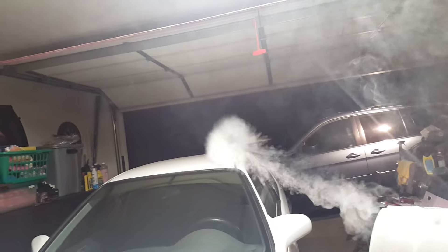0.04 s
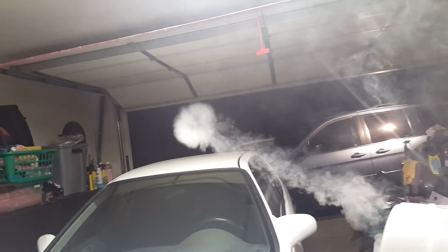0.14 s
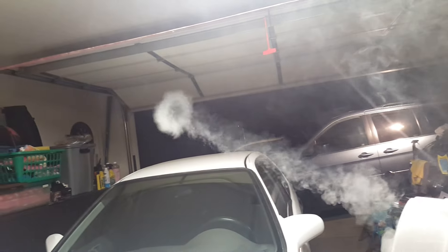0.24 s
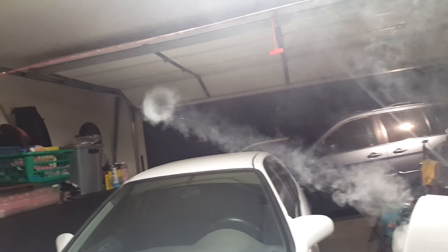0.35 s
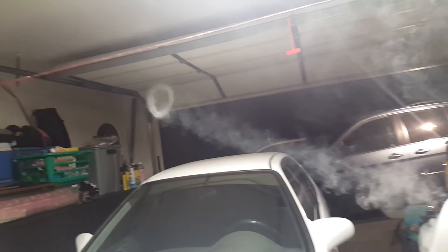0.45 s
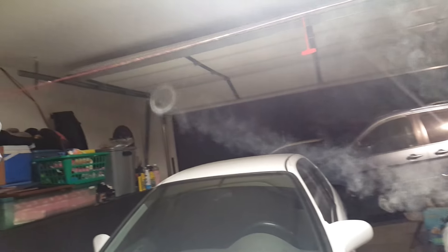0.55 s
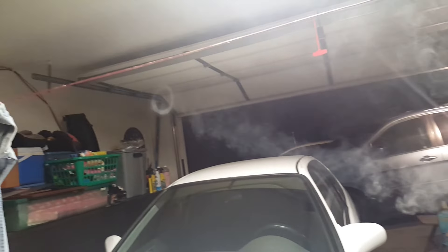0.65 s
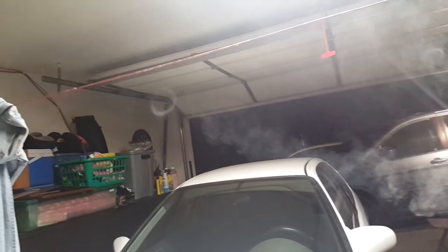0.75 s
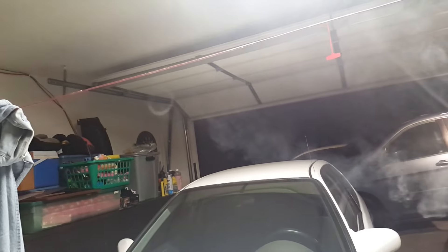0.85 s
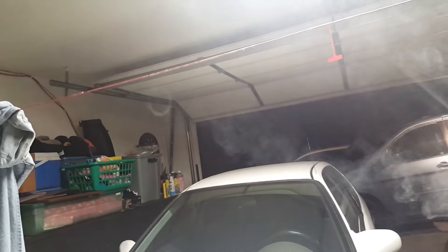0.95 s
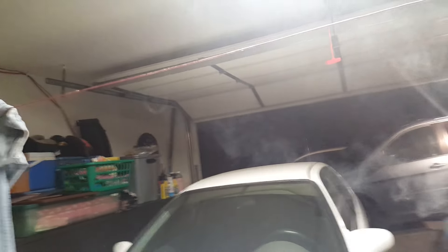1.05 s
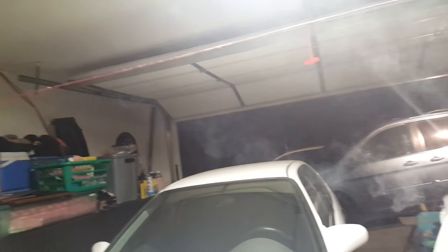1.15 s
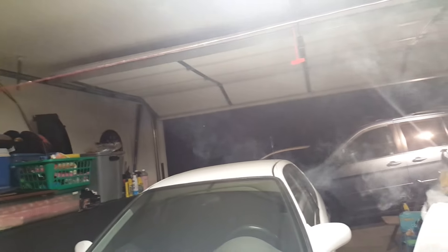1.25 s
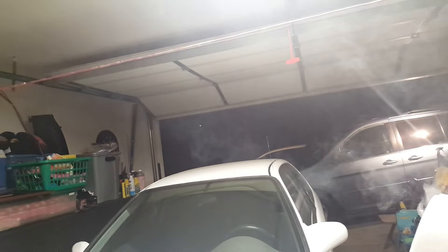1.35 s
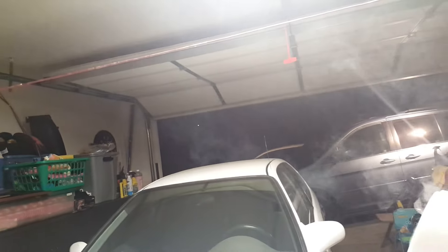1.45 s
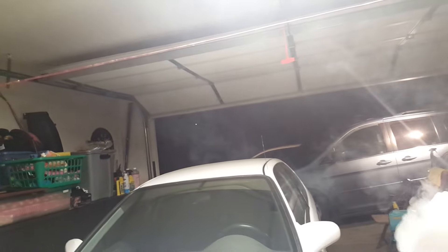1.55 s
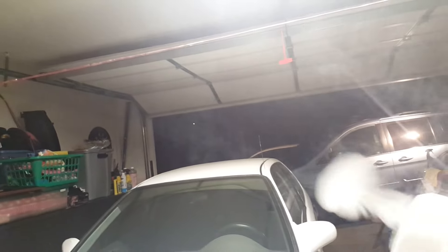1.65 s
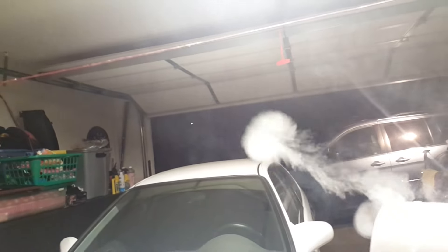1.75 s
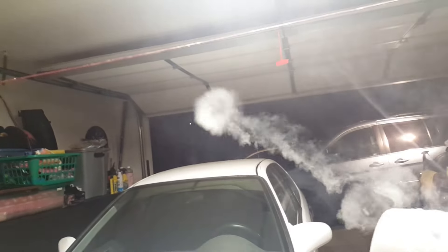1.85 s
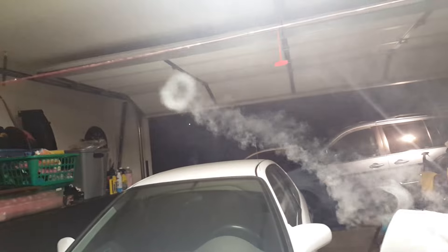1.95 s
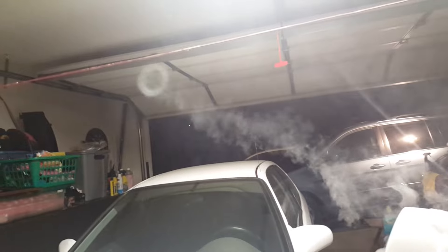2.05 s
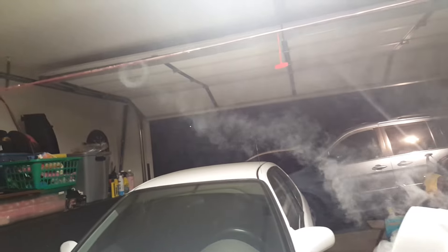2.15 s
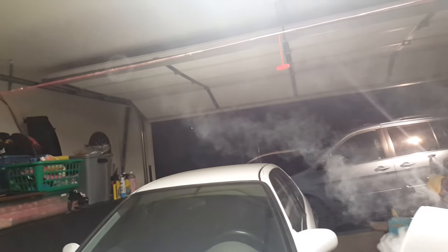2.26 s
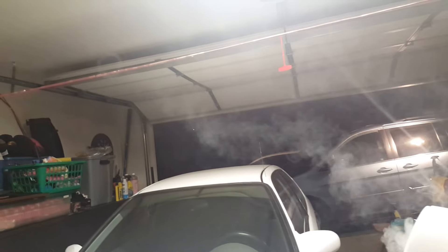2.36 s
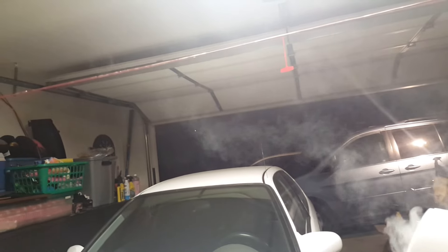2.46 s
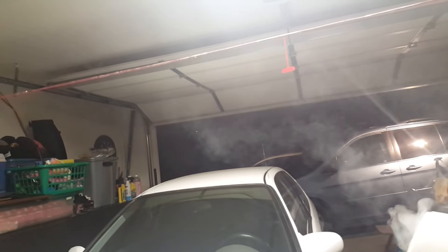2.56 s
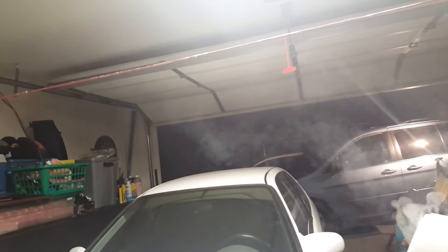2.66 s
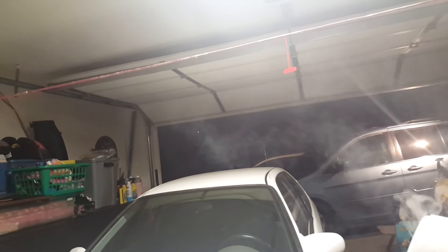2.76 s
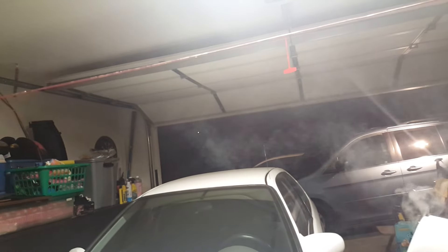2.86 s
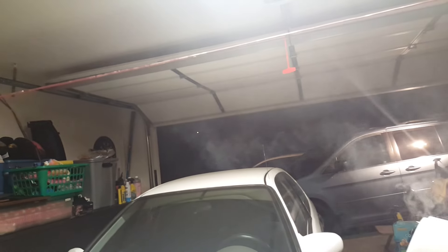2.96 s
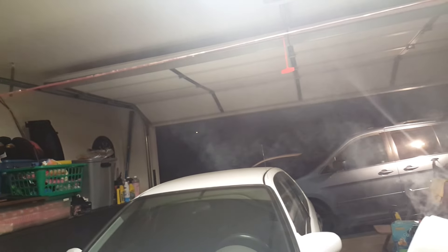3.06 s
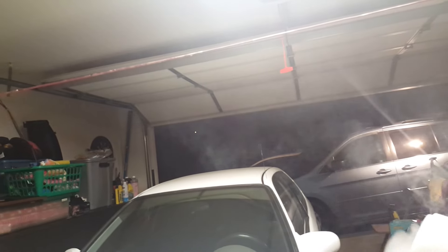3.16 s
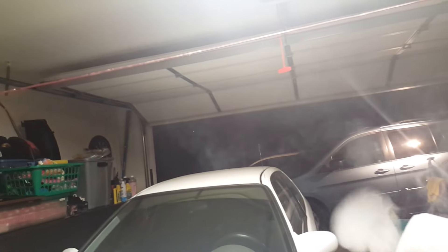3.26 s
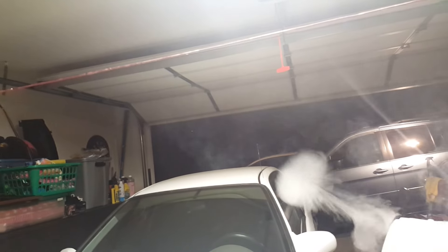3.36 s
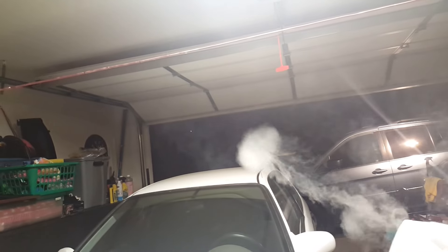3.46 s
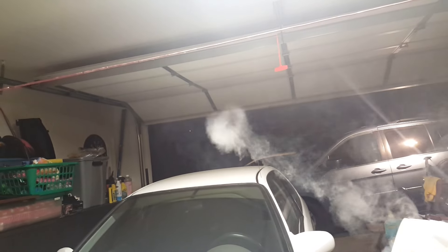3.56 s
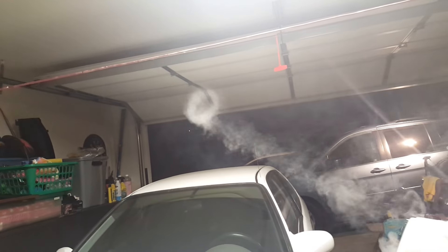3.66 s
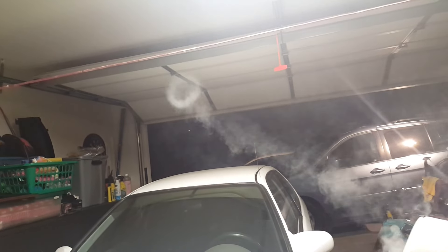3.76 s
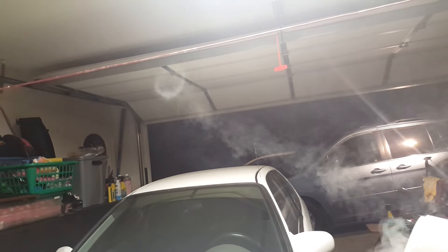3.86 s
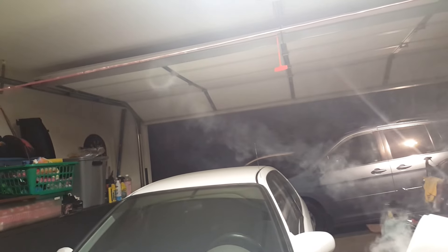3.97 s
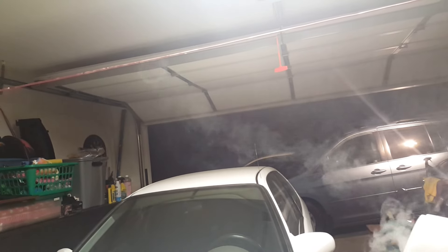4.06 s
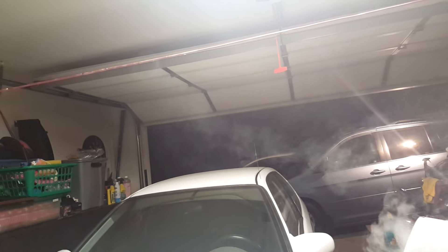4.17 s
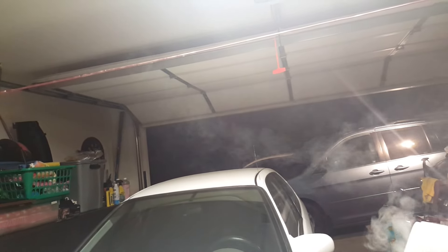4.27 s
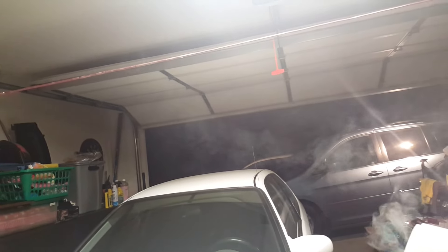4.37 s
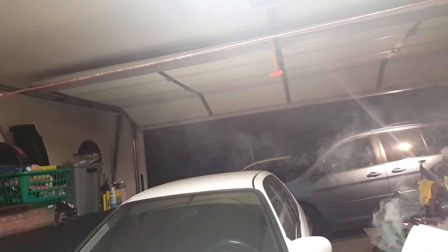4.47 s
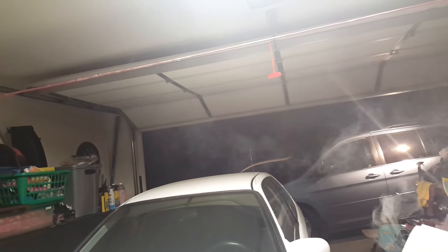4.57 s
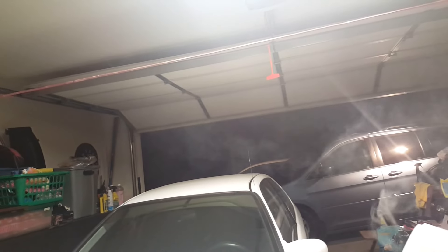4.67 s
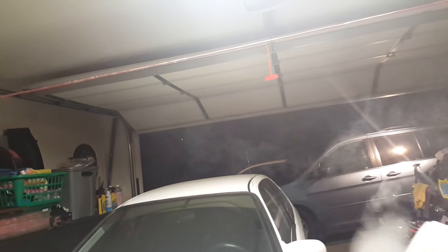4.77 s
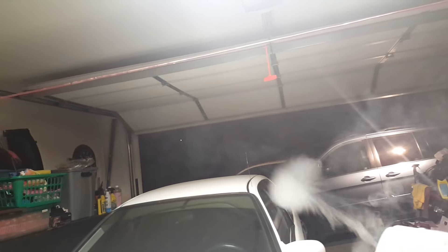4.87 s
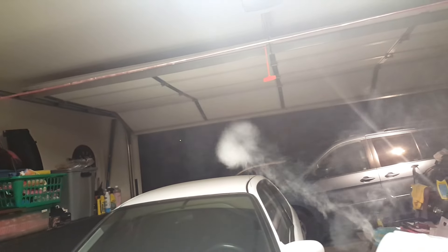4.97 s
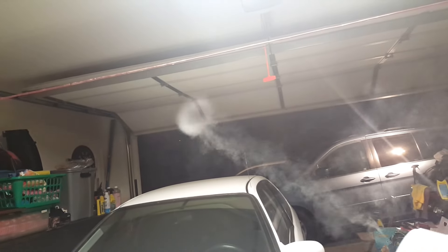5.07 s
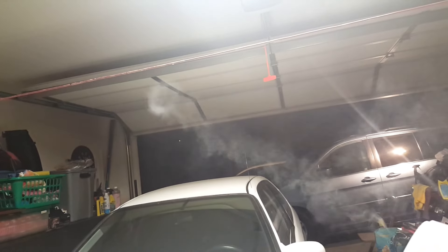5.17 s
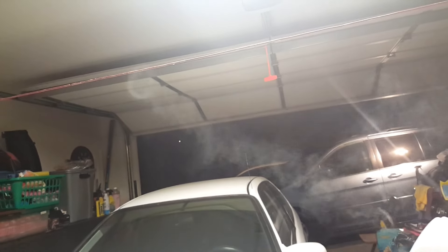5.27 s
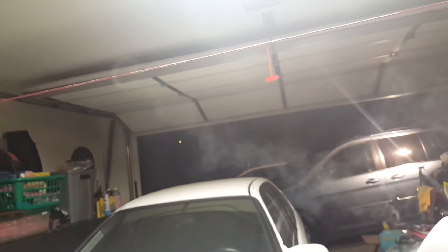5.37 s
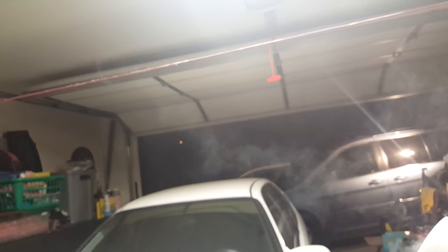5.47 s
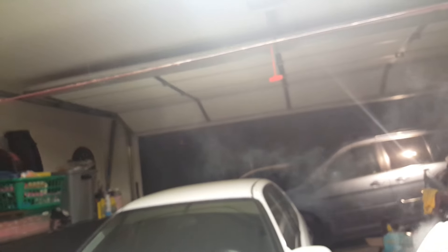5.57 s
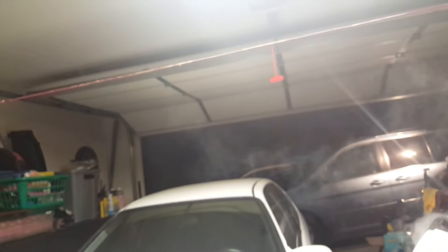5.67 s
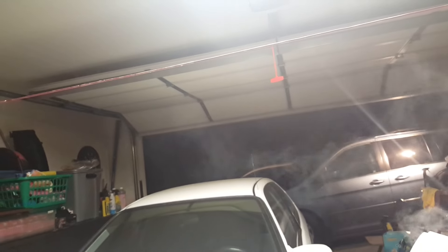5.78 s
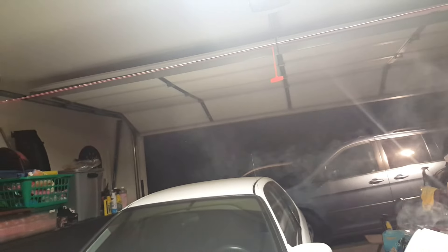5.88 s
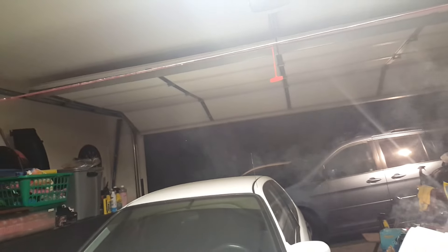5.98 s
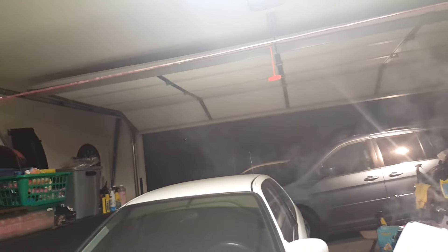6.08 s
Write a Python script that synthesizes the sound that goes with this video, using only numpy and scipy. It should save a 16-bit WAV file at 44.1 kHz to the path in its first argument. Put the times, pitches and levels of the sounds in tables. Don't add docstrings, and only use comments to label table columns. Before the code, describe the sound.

The scene opens on the dying hollow echo of an earlier shot over quiet distant traffic rumble and a faint low engine hum, with a small dry tick near the microphone at 0.25 s. From 0.9 to 1.4 s a plastic sheet is drawn back, crinkling, snapping and thumping its barrel. At 1.7 s it slaps taut: a quick flutter, a sharp thwack and a short boxy boom with a puff of air. Ticks follow around 2.0 s. More crackling and knocks run from 2.4 to 3.2 s, then a softer shot at 3.3 s. Ticks return at 3.6 to 4.0 s. Strong snaps and thumps start at 4.2 s, with a barely audible high squeak near 4.6 s, before the third shot at 4.85 s. From 5.3 s a faint rising swish and renewed crinkles and bumps continue to the end at about 6.1 s. Short bright concrete garage echo throughout.

```python
import sys
import numpy as np
from scipy import signal
from scipy.fft import rfft, irfft
from scipy.io import wavfile

SR = 44100
rng = np.random.default_rng(int(sys.argv[2]) if len(sys.argv) > 2 else 0)


def unload_audio(sound):
    columns = np.transpose(np.atleast_2d(sound))
    steps = np.round(np.clip(columns, -1, 1) * 32767)
    wavfile.write(sys.argv[1], SR, steps.astype(np.int16))


def to_linear_factor(level_db):
    exponent = np.asarray(level_db, float) / 20
    return 10 ** exponent


N = 269892
LEAD = 8820
TIME = (np.arange(N + LEAD) - LEAD) / SR


def rms_one(x):
    return x / np.sqrt(np.mean(x ** 2) + 1e-20)


def in_time(rows, outside=None):
    s, *columns = np.transpose(rows)
    return [np.interp(TIME, s, column, outside, outside) for column in columns]


def pitch_and_level(rows):
    return in_time(rows)[0], in_time(rows, -120)[1]


def at_hz(points, hz):
    points = np.array(points)
    return np.interp(np.log(hz), np.log(points[:, 0]), points[:, 1])


def band(x, low_hz, high_hz):
    return signal.sosfilt(signal.butter(2, [low_hz, high_hz], "band", fs=SR, output="sos"), x)


def colour(x, spectrum):
    cepstrum = irfft(at_hz(spectrum, np.linspace(1, SR / 2, 2049)) * np.log(10) / 20)
    cepstrum[1:2048] *= 2
    cepstrum[2049:] = 0
    pulse = irfft(np.exp(rfft(cepstrum)))
    return signal.fftconvolve(x, pulse / np.linalg.norm(pulse))[:len(x)]


def drift(rate):
    r = np.exp(-80 * np.pi * rate / SR)
    white = rng.standard_normal(len(TIME) // 40 + 2002)
    slow = signal.lfilter([1], [1, -2 * r, r * r], white)[2000:]
    return np.interp(np.arange(len(TIME)) / 40, np.arange(len(slow)), rms_one(slow))


def clicks(times, dbs):
    out = np.zeros(len(TIME))
    out[np.round(np.asarray(times) * SR).astype(int) + LEAD] = to_linear_factor(dbs)
    return out


def bursts(times, dbs, lengths, rise_s):
    out = np.zeros(len(TIME))
    for s, db, length in zip(times, dbs, lengths):
        at = round(s * SR) + LEAD
        tail = out[at:at + 6000]
        t = np.arange(len(tail)) / SR
        tail += to_linear_factor(db) * np.exp(-t / max(length, 1e-4)) * (1 - np.exp(-t / rise_s))
    return out


def crackle(per_s, spread_db):
    sizes = to_linear_factor(spread_db * np.minimum(rng.exponential(1, len(TIME)), 4))
    signs = rng.choice([-1, 1], len(TIME))
    return rms_one(sizes * signs * (rng.random(len(TIME)) < per_s / SR))


def narrow_tone(rows, width_hz, wobble_db):
    hz, db = pitch_and_level(rows)
    level = to_linear_factor(db + 2.5 + wobble_db * drift(width_hz))
    return level * np.sin(2 * np.pi * np.cumsum(hz + width_hz * drift(width_hz)) / SR)


# frequency in Hz, left-right correlation.
LIKENESS = [(60, 0.95), (150, 0.96), (380, 0.9), (950, 0.2), (2380, -0.082), (5980, -0.044), (15000, 0.078)]
# frequency in Hz, left minus right in dB.
LEAN = [(60, .5), (250, 0), (1000, -1), (2000, -2.7), (4000, -1.3), (8000, .4), (14000, 1.3)]


def stereo_noise(size, band_gain, low_hz, high_hz):
    out = 0
    edges = low_hz * 2 ** np.arange(0, np.log2(high_hz / low_hz) + .01, .5)
    white = rng.standard_normal((2, 2, size))
    for k, (low, high) in enumerate(zip(edges, edges[1:])):
        mid, side = band(white[k % 2], low, high)
        hz = np.sqrt(low * high)
        alike = np.clip(at_hz(LIKENESS, hz), -1, 1)
        lean = to_linear_factor(at_hz(LEAN, hz) / 2)
        pair = np.sqrt(1 + alike) * mid + np.sqrt(1 - alike) * side * [[1], [-1]]
        out = out + band_gain(hz) * pair * [[lean], [1 / lean]]
    return out


# time in seconds, rumble level in dB.
TRAFFIC = [(0, -43.5), (.5, -45), (1.5, -47.5), (2.0, -46.5), (2.9, -48), (3.7, -47.5), (4.4, -48),
           (5.1, -48.5), (5.8, -46), (6.12, -48.5)]
# frequency in Hz, density in dB per Hz.
RUMBLE = [(15, -41), (25, -15), (59, -11.5), (97, 0), (151, -16), (210, 0), (267, -12.5), (403, -11.5),
          (466, -18), (518, -37), (600, -21), (780, -52), (1320, -120)]
# frequency in Hz, density in dB per Hz.
ROAD = [(300, -27), (450, -12), (650, -4.5), (1050, 1), (1250, -6), (1700, -8), (2100, -10.5),
        (2700, -12.5), (3000, -17.5), (4500, -24.5), (9000, -37.5), (11500, -43)]
# time in seconds, pitch in Hz, level in dB.
ENGINES = [
    [(.1, 92, -49.5), (.3, 91, -50), (.5, 89, -49), (.57, 92.7, -61), (.66, 102, -52), (.75, 104.4, -45)],
    [(.85, 107.6, -45), (.97, 114.5, -45.5), (1.15, 110.8, -51), (1.45, 107.6, -38), (1.75, 104.2, -48.5),
     (2.0, 106.3, -50.5), (2.65, 107.5, -48), (3.3, 112.8, -50.5), (3.9, 120.4, -53)],
]


def outside():
    mean_road_db, road_follows, hiss_db = -56.5, 1.54, -76.5
    rumble_db, = in_time(TRAFFIC)
    road_db = mean_road_db + road_follows * (rumble_db - rumble_db.mean())
    rumble = stereo_noise(len(TIME), lambda hz: to_linear_factor(at_hz(RUMBLE, hz) + 2 * drift(1.0)), 21.44, 750)
    road = stereo_noise(len(TIME), lambda hz: to_linear_factor(2 * drift(2.34)), 232.0, 11500)
    road = np.array([colour(port, ROAD) for port in road])
    traffic = to_linear_factor(rumble_db + 1.0) * rms_one(rumble) + to_linear_factor(road_db + 3.5) * rms_one(road)
    hum = sum(narrow_tone(engine, 3.05, 1.4) for engine in ENGINES)
    hiss = signal.lfilter([1], [1, -.3], rng.standard_normal((2, len(TIME))))
    return traffic + to_linear_factor(hiss_db + 4.5) * hiss + hum


# time in seconds, peak in dB, left minus right in dB.
TICKS = [(0.2508, -35.5, -3), (1.5444, -61, -2), (2.0325, -37, -2), (2.1279, -45, -3), (3.6278, -34, -1.5),
         (3.7579, -44, -4), (3.9924, -45, 0)]


def ticks():
    s, db, pan_db = np.transpose(TICKS)
    pair = []
    for side in (1, -1):
        port_db = db + side * pan_db / 2
        fizz = bursts(s, port_db + 7, .004 + 0 * s, .0002) * rng.standard_normal(len(TIME))
        pair.append(clicks(s, port_db + 26) + fizz)
    bright = signal.sosfilt(signal.butter(2, 4800, "high", fs=SR, output="sos"), pair)
    return band(pair, 900, 1900) + to_linear_factor(-27.5) * bright


# time in seconds, pitch in Hz, level in dB.
SQUEAK = [(4.5, 14500, -90), (4.56, 15100, -71), (4.63, 15350, -67), (4.7, 15050, -70), (4.76, 14600, -80)]


def squeak():
    return narrow_tone(SQUEAK, 150, 4) * [[1], [.3]]


# time in seconds, centre in Hz, level in dB.
SWISH = [(5.3, 1400, -79), (5.4, 1634, -62.5), (5.5, 1700, -60), (5.62, 1802, -57.5), (5.7, 1910, -65)]


def swish():
    hz, db = pitch_and_level(SWISH)
    half_band = signal.butter(2, 210, fs=SR, output="sos")
    rough = signal.sosfilt(half_band, rng.standard_normal(len(TIME)))
    return to_linear_factor(db + 6 + 3.5 * drift(30)) * rms_one(rough) * np.sin(2 * np.pi * np.cumsum(hz) / SR)


# start in seconds, length in seconds,
# crinkle level in dB, barrel rumble level in dB, fade over the stroke in dB.
PULLS = [(0.884, 0.063, -44.5, -33, -10.5), (0.972, 0.098, -32, -29.5, 21.5), (1.089, 0.16, -46, -39, 6),
         (1.332, 0.063, -39, -49, 9.5), (2.429, 0.092, -77, -43, -15.5), (2.539, 0.22, -34, -22.5, 23.5),
         (2.912, 0.091, -77, -49.5, -17), (3.033, 0.047, -59, -35, 16), (3.112, 0.022, -41, -50, 21),
         (3.198, 0.083, -57.5, -36, -1), (4.19, 0.044, -51.5, -35, 1), (4.276, 0.066, -31.5, -36, 12.5),
         (4.346, 0.13, -50, -34, 12.5), (4.48, 0.227, -53, -36.5, 1.5), (4.755, 0.017, -28.5, -33, 27),
         (5.3, 0.11, -60, -71, 4), (5.486, 0.19, -63, -54, -14.5), (5.666, 0.11, -36.5, -27.5, 4.5),
         (5.808, 0.11, -47, -38.5, 3), (5.96, 0.086, -55, -32.5, 16)]


def strokes():
    grip_s, ease_s, silent_db = .011, .065, 29
    levels = []
    for s, length, crinkle_db, rumble_db, fade_db in PULLS:
        end = s + length
        shape = [(s - grip_s, -silent_db), (s, 0), (end, -fade_db), (end + ease_s, -fade_db - silent_db)]
        shape_db, = in_time(shape, -120)
        levels.append([crinkle_db + shape_db, rumble_db + shape_db])
    return np.max(levels, axis=0)


# time in seconds, knock peak in dB,
# bright edge in dB, barrel thump in dB.
SNAPS = [(0.875, -36.5, -67, -34), (0.906, -33, -44, -34), (0.955, -22.5, -36.5, -17),
         (1.088, -31.5, -64, -25), (1.141, -28.5, -46, -31), (1.226, -27.5, -40, -20.5),
         (1.335, -55, -35, -45), (1.665, -18.5, -33, -20), (2.524, -29, -40, -26),
         (2.543, -21.5, -30.5, -21), (2.616, -25.5, -55, -18.5), (2.694, -28, -40, -20),
         (2.71, -27, -32, -42), (2.935, -35.5, -63, -31), (3.028, -29, -35, -27.5),
         (3.111, -35.5, -52, -25), (4.19, -29, -56, -28), (4.256, -24, -36.5, -14),
         (4.272, -17.5, -31.5, -11.5), (4.472, -22.5, -36, -27.5), (4.612, -28, -49, -25.5),
         (4.649, -29, -70, -21.5), (4.754, -32, -42.5, -21.5), (5.312, -42.5, -46.5, -39.5),
         (5.463, -38.5, -71, -32), (5.654, -26.5, -43, -30), (5.668, -24, -34.5, -25),
         (5.754, -27, -33.5, -17.5), (5.937, -30, -35, -29), (6.103, -30, -46.5, -23)]
# frequency in Hz, density in dB per Hz.
CREASE = [(300, -54), (600, -2.5), (1100, 6.5), (1400, 5), (1800, 0.5), (2500, -1.5), (3500, -4),
          (6000, -19), (16000, -48)]
# frequency in Hz, density in dB per Hz.
CREASE_EDGE = [(1200, -30), (2200, -8), (3200, 0), (6000, -1), (10000, -5), (16000, -11)]


def snaps():
    s, knock_db, edge_db, _ = np.transpose(SNAPS)
    give = bursts(s, knock_db - 8, 0.005 + 0 * s, 0.00038) * crackle(12000, 0.79)
    knocks = colour(clicks(s, knock_db + 5.5) + give, CREASE)
    return knocks + colour(clicks(s, edge_db + 14), CREASE_EDGE)


# time the sheet is taut in seconds, slap in dB, barrel in dB,
# first flap against the slap in dB, lead of the slap in seconds.
SHOTS = [
    (-.14, -13.5, -6.5, -15, 0.0012),
    (1.684, -18.5, -15.5, -13, 0.0026),
    (3.301, -21.5, -20, -7, 0.0082),
    (4.851, -20, -15.5, -3, 0.0012),
]


def stages():
    rows = []
    for s, slap_db, boom_db, first_db, early in SHOTS:
        let_go_db = first_db - 11
        rows.append((s - 0.025, slap_db + let_go_db, 0.013, boom_db + let_go_db))
        rows.append((s - 0.016, slap_db + first_db, 0.022, boom_db - 5))
        rows.append((s - early, slap_db, 0.031, boom_db))
    return np.transpose(rows)


# frequency in Hz, density in dB per Hz.
SHEET = [(47, -34), (80, -32), (146, -10), (413, 1), (563, -7), (657, -3), (980, -7), (1120, -9.5),
         (1340, -11), (2540, -13), (4730, -25), (12500, -35.5), (16000, -41.5)]


def sheet():
    shot_s, slap_db, flutter_s, _ = stages()
    crinkle_db, _ = strokes()
    flap = bursts(shot_s, slap_db + 4, flutter_s, 0.0022) * crackle(14000, 2.3)
    crinkle = to_linear_factor(crinkle_db - 4 + 4 * drift(40)) * crackle(1500, 4)
    return colour(flap + crinkle, SHEET)


# time in seconds, barrel thump in dB.
LURCHES = [(.892, -23.5), (.925, -22), (0.966, -19), (.997, -28), (1.033, -33), (1.054, -33), (1.245, -30),
           (1.379, -24), (1.392, -28), (2.299, -37.5), (2.484, -45), (2.889, -39.5), (3.837, -34),
           (4.25, -19.5), (4.302, -33), (4.419, -32), (4.522, -34), (4.577, -34), (4.689, -27),
           (5.531, -34), (5.56, -30), (5.638, -30.5), (5.711, -25), (5.729, -24), (5.776, -45),
           (5.847, -33), (5.961, -31), (6.028, -30.5)]
# time from taut in seconds, level in dB,
# pitch in Hz, swell time in seconds.
BOUNCES = [
    (-.015, -7, 337, 0.0066),
    (-.001, 1, 405, 0.0055),
    (.018, -3.5, 402, 0.0017),
    (.034, -16, 370, .006),
    (.062, -14, 334.7, 0.0087),
]


def jolts():
    handled = [(s - .002, db, 0.0032) for s, _, _, db in SNAPS]
    handled += [(s, db, 0.0043) for s, db in LURCHES]
    rows = []
    for s, db, swell in handled:
        pose, pace = rng.uniform(-1, 1, 2)
        rows.append((s, db, 387.2 + 32 * pose, swell * (1 + 0.11 * pace)))
    for taut_s, _, boom_db, _, _ in SHOTS[1:]:
        rows += [(taut_s + s, boom_db + 10 + db, hz, swell) for s, db, hz, swell in BOUNCES]
    return rows


def thumps(pushes):
    out = np.zeros(len(TIME))
    for s, db, hz, swell in pushes:
        at = round(s * SR) + LEAD
        tail = out[at:at + 3000]
        t = np.arange(len(tail)) / SR
        envelope = t / swell * np.exp(1 - t / swell)
        tail += to_linear_factor(db - 5.5) * envelope * np.sin(2 * np.pi * hz * t)
    return out


# frequency in Hz, width in Hz, level in dB.
BARREL = [(218, 75, -2), (285.6, 8.9, 4.5), (336, 88, -1.5), (407.3, 67, 3), (477, 68, -12.5),
          (650, 140, -8.5), (750, 130, -21), (890, 92, -10), (1080, 175, -12), (1700, 177, -15),
          (2420, 1300, -34)]


def barrel(push):
    out = 0
    for k, (hz, width, db) in enumerate(BARREL):
        r = np.exp(-np.pi * width / SR)
        poles = [1, -2 * r * np.cos(2 * np.pi * hz / SR), r * r]
        out = out + (-1) ** k * to_linear_factor(db) * signal.lfilter([1 - r, 0, r - 1], poles, push)
    return out


def ringing_barrel(pushes):
    shot_s, _, flutter_s, boom_db = stages()
    _, rumble_db = strokes()
    push_s, push_db, _, _ = np.transpose(pushes)
    shaking = bursts(shot_s, boom_db + 26.5, flutter_s * 0.51, 0.0096)
    shaking = shaking + to_linear_factor(rumble_db + 7 + 5.4 * drift(23))
    return barrel(shaking * crackle(5000, 2.45) + clicks(push_s, push_db + 24))


def puff():
    shot_s, _, _, boom_db = stages()
    return band(bursts(shot_s, boom_db - 11, 0.0044 + 0 * shot_s, .002), 40, 130)


def cannon():
    pushes = jolts()
    return sheet() + snaps() + ringing_barrel(pushes) + thumps(pushes) + puff()


# frequency in Hz, reverberation time T60 in seconds.
GARAGE_T60 = [(100, 0.33), (300, 0.26), (1000, 0.23), (3000, 0.28), (8000, .3), (15000, 0.23)]
# frequency in Hz, level in dB.
GARAGE_WET = [(100, -12.5), (300, -7.5), (600, 0), (1500, 4), (5000, 7), (15000, 7)]


def garage(x):
    t = np.arange(SR * 7 // 10) / SR
    near = 1.62 * np.exp(-t / 0.0051)
    thickening = (1 - np.exp(-t / 0.0066)) ** 2
    spot = 1.5 * drift(12)
    out = to_linear_factor([[-0.5], [0.03]]) * np.array([np.roll(x, 7), x])
    for share in (np.cos(spot), np.sin(spot)):
        echoes = stereo_noise(len(t), lambda hz: to_linear_factor(at_hz(GARAGE_WET, hz) - 60 * t / at_hz(GARAGE_T60, hz)),
                              44, 16500)
        response = to_linear_factor(-30) * echoes * (near + thickening)
        out = out + signal.fftconvolve((share * x)[None], response, axes=1)[:, :len(TIME)]
    return out


def scene():
    return (garage(cannon() + swish()) + squeak() + ticks() + outside())[:, LEAD:]


def roll_off(x):
    return signal.sosfilt(signal.butter(12, 16510, fs=SR, output="sos"), x)


def record(dry):
    rounded = .9 * np.tanh(dry / .9)
    mix = signal.sosfilt(signal.cheby2(10, 40, 16200, fs=SR, output="sos"), rounded)
    return roll_off(mix)


dry = scene()
out = record(dry)
unload_audio(out)
```